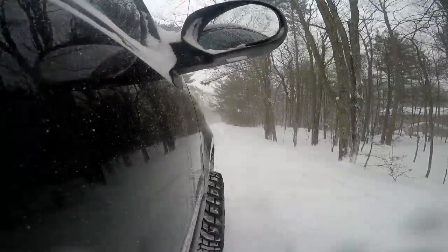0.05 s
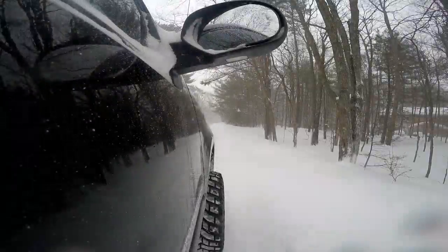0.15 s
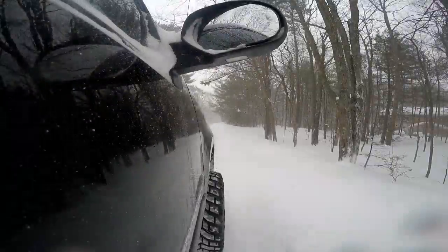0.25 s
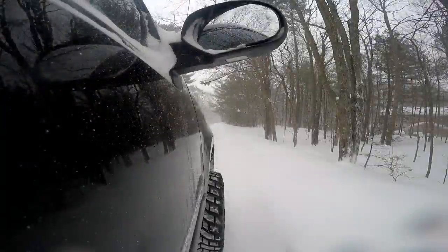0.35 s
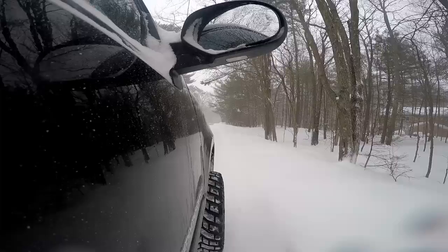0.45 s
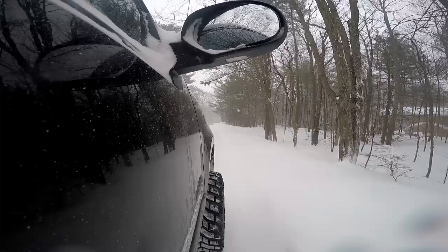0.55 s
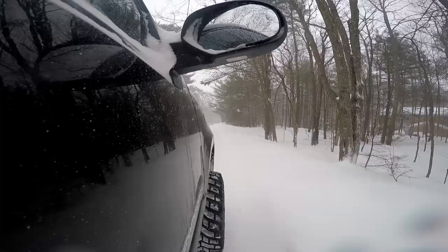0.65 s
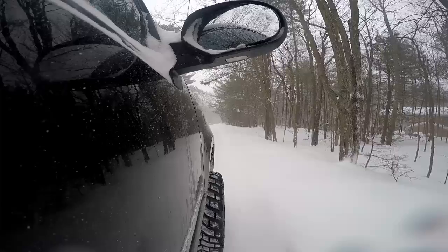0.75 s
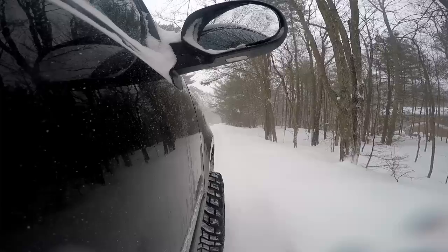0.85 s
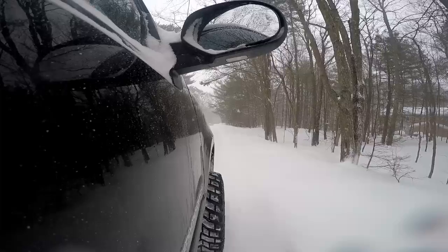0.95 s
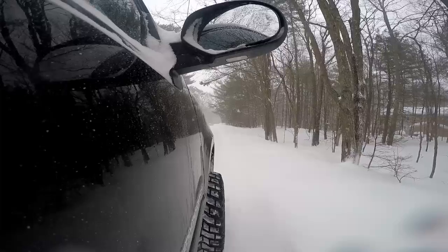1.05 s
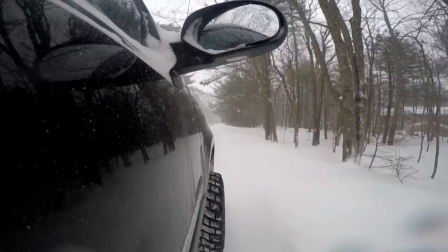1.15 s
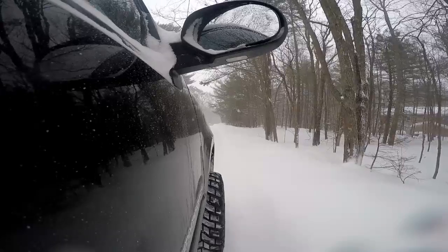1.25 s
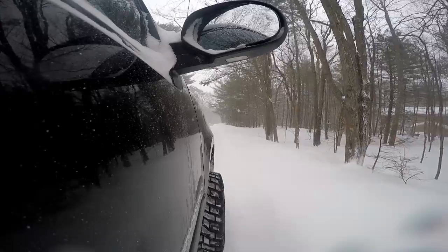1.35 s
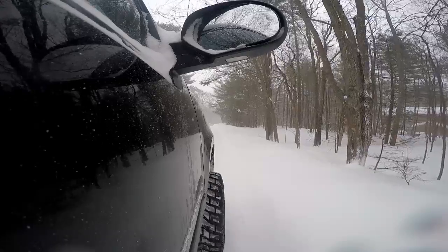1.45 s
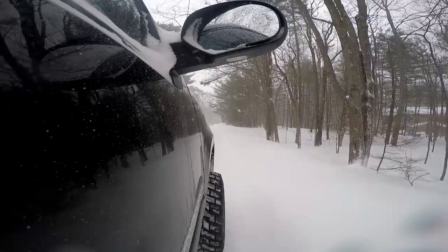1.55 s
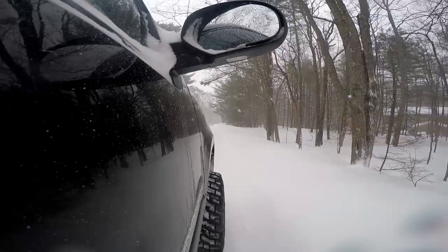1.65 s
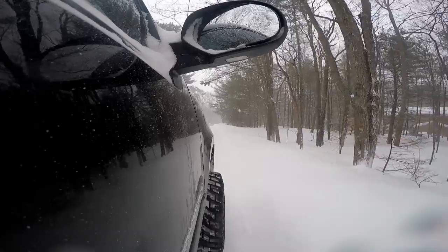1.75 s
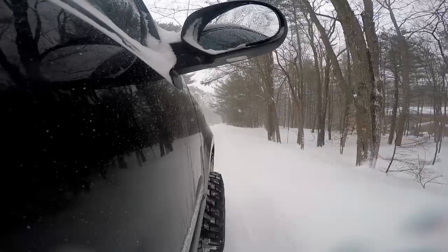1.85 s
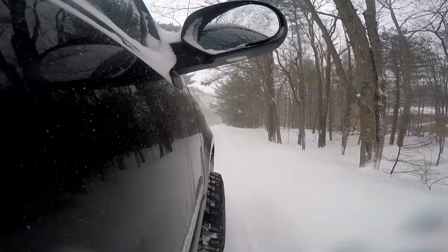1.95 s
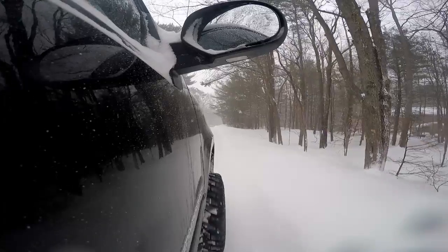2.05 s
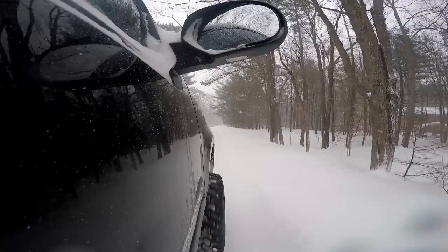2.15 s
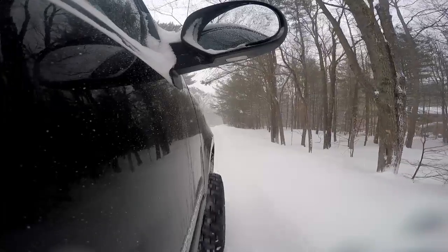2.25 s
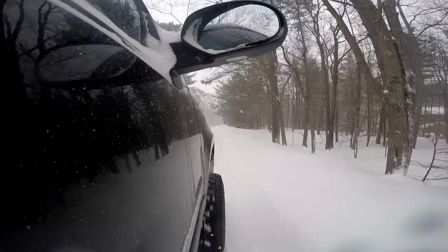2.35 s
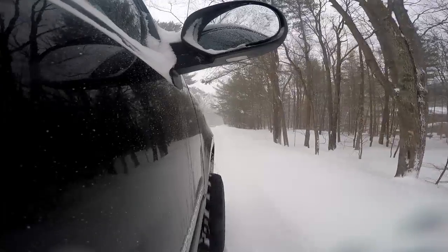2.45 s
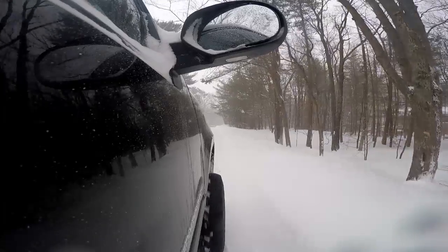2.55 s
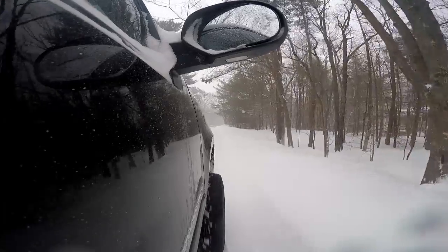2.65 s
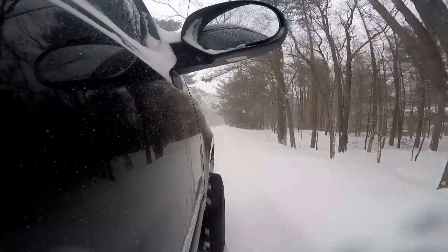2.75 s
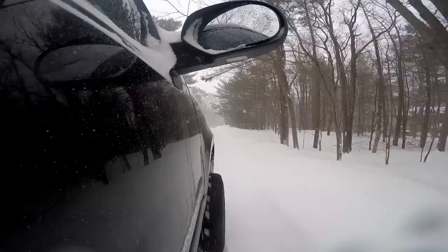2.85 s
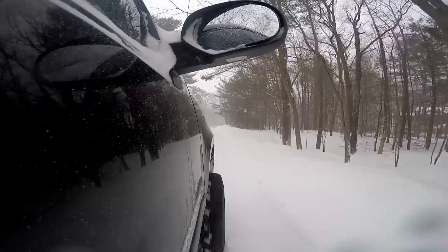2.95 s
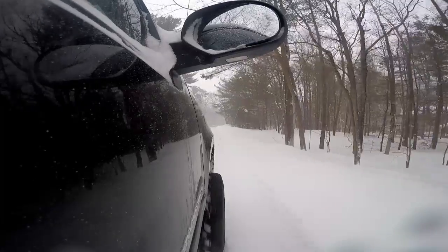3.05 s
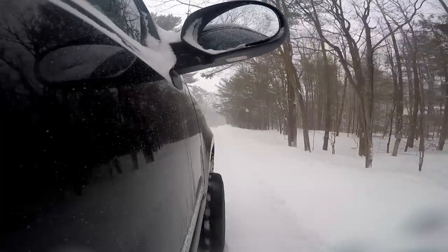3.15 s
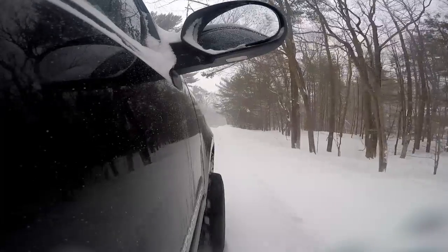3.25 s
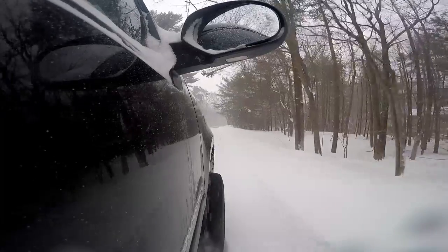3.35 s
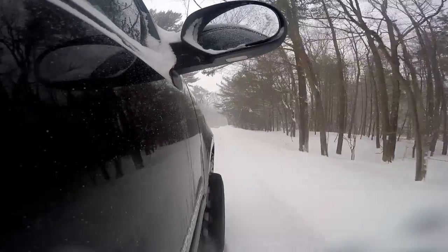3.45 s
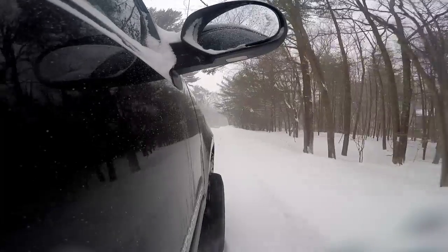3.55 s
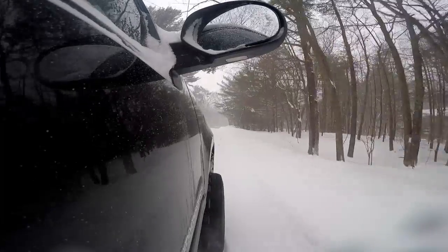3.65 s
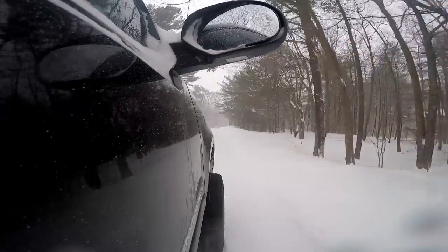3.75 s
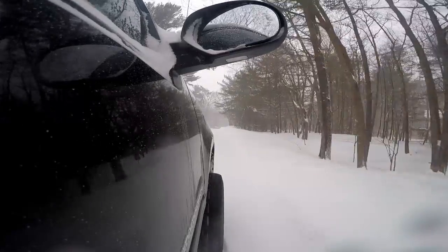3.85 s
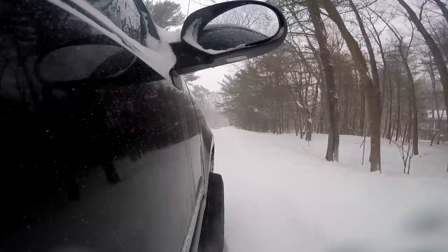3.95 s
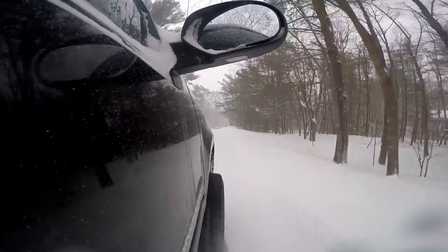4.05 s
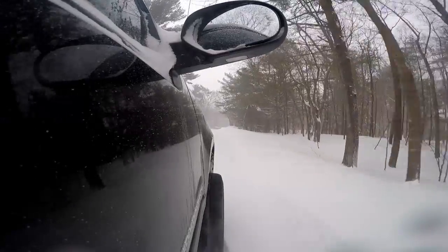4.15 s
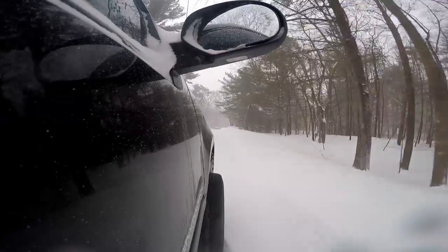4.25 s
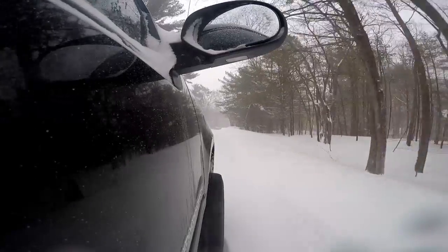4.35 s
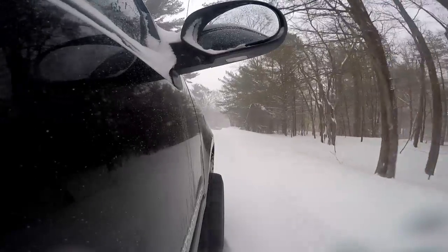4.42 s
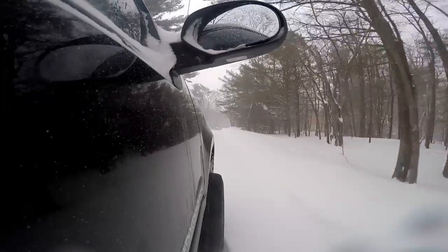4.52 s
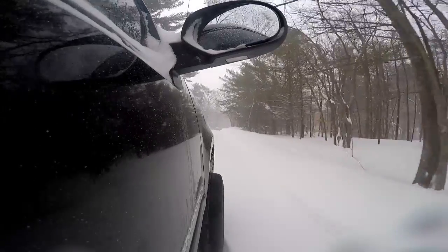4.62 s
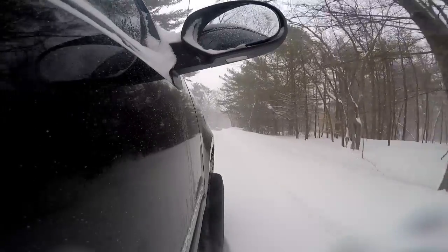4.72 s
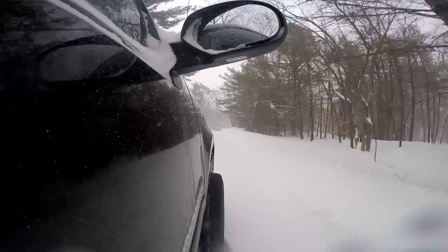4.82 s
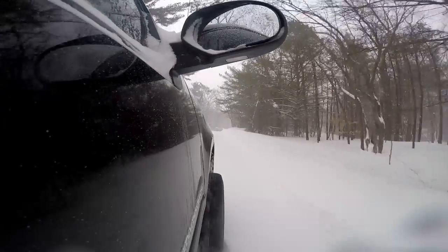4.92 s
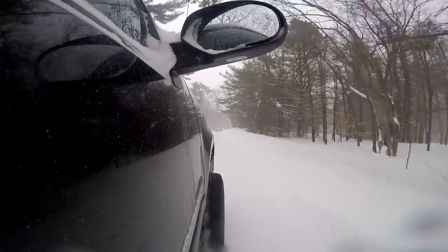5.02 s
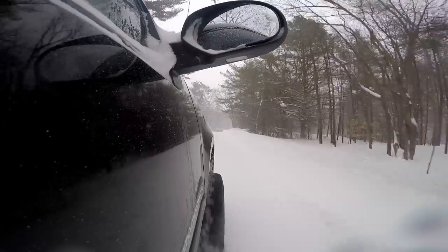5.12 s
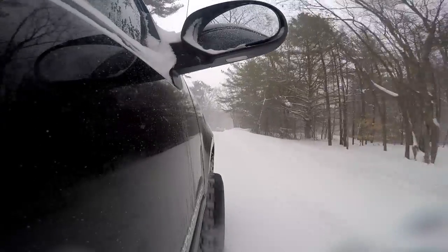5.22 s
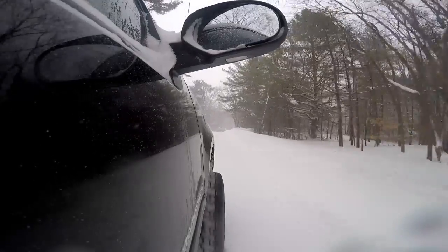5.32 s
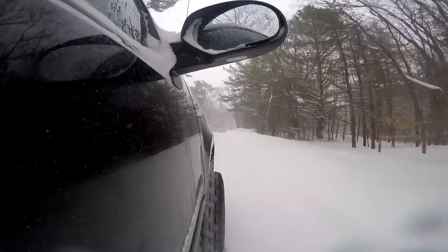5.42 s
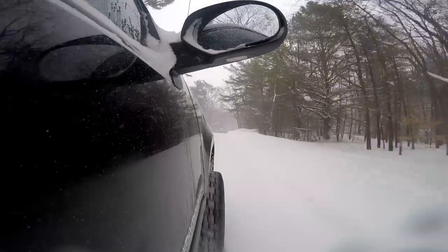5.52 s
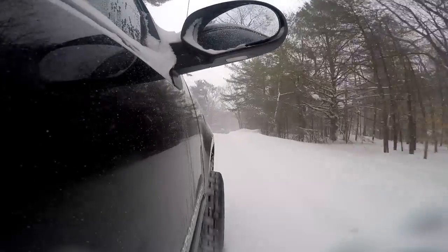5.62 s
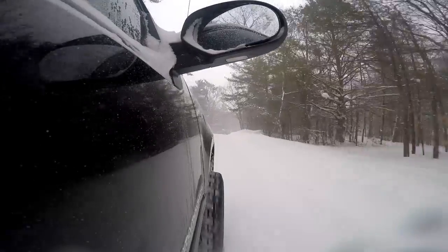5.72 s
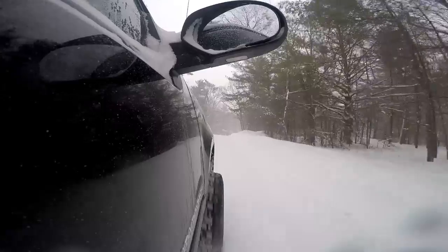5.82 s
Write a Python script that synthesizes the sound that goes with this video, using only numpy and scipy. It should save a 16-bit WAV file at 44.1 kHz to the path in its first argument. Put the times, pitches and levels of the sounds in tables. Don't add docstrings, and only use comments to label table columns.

```python
import sys
import numpy as np
from scipy import signal
from scipy.fft import rfft, irfft
from scipy.io import wavfile
from scipy.ndimage import uniform_filter1d

SR = 44100
rng = np.random.default_rng(int(sys.argv[2]) if len(sys.argv) > 2 else 0)


def elevation(decibels):
    levels = np.asarray(decibels, float)
    return 10 ** (levels / 20)


def bounce(signal):
    frames = np.transpose(np.atleast_2d(signal))
    limited = np.clip(frames, -1, 1)
    pcm = np.round(limited * 32767).astype(np.int16)
    wavfile.write(sys.argv[1], SR, pcm)


N = 259308


def rms_one(x):
    return x / np.sqrt(np.mean(x ** 2) + 1e-20)


def in_time(rows):
    s, *columns = np.transpose(rows)
    return [np.interp(np.arange(N) / SR, s, column) for column in columns]


def at_hz(points, hz):
    table_hz, table_db = np.array(points).T
    return np.interp(np.log(hz), np.log(table_hz), table_db)


def drift(rate):
    r = np.exp(-80 * np.pi * rate / SR)
    steps = rng.standard_normal(N // 40 + 2002)
    slow = signal.lfilter([1], [1, -2 * r, r * r], steps)[2000:]
    return np.interp(np.arange(N) / 40, np.arange(len(slow)), rms_one(slow))


def resonance(x, hz, width_hz):
    r = np.exp(-np.pi * width_hz / SR)
    top = np.array([1, 0, -1]) * (1 - r * r) / 2
    bottom = [1, -2 * r * np.cos(2 * np.pi * hz / SR), r * r]
    return signal.lfilter(top, bottom, x + 1e-18)


def band(x, low_hz, high_hz):
    edges_hz = [low_hz, min(high_hz, .45 * SR)]
    return signal.sosfilt(signal.butter(2, edges_hz, "band", fs=SR, output="sos"), x)


def coloured(spectrum, patchy_db):
    hz = np.maximum(np.arange(N // 2 + 1) * SR / N, 1)
    lowest_hz, highest_hz = spectrum[0][0], spectrum[-1][0]
    shaped = rfft(rng.standard_normal(N)) * elevation(at_hz(spectrum, hz)) * (hz > .7 * lowest_hz)
    out = np.zeros(N)
    for centre in np.arange(np.floor(np.log2(lowest_hz)), np.log2(highest_hz) + 1):
        share = np.clip(1 - np.abs(np.log2(hz) - centre), 0, 1)
        out += irfft(shaped * share, N) * elevation(patchy_db * drift(16.0))
    return rms_one(out)


def swells(rows, rise_db_per_s, sag_db_per_s, fall_db_per_s):
    t, out = np.arange(N) / SR, np.full(N, -90.)
    for s, peak_db, held_s, *_ in rows:
        rise_db = rise_db_per_s * np.minimum(t - s, 0)
        sag_db = sag_db_per_s * np.clip(t - s, 0, held_s)
        fall_db = fall_db_per_s * np.maximum(t - s - held_s, 0)
        out = np.maximum(out, peak_db + rise_db - sag_db - fall_db)
    return out


# (time [s], firings [per s])
SPEED_CURVE = [(0.0, 42.0), (0.52, 50.0), (0.97, 69.5), (1.25, 65.5), (1.5, 53.0), (1.88, 56.0),
               (2.13, 102.5), (2.41, 120.9), (2.7, 132.7), (3.1, 144.2), (3.96, 199.5), (4.15, 216.0),
               (4.58, 263.3), (4.66, 267.5), (4.81, 248.5), (5.4, 101.2), (5.62, 86.0), (5.88, 96.0)]
# (time [s], airflow [0-1], combustion [0-1])
PEDAL_CURVE = [(0, 0.08, 0.1), (.5, 0.19, 0), (.95, 0.04, 0.79), (1.5, 0.17, 0.2), (1.85, 0.29, 0),
               (2.12, 0.19, 0.78), (2.42, 0.29, 0.67), (2.7, 0.34, 0.41), (3.0, 0.23, 0.86),
               (3.55, 0.61, 0.67), (4.3, 0.89, 0.86), (4.6, 1, 0.85), (4.68, 0.82, 0.17), (4.8, 0.35, 0.43),
               (5.0, 0.18, 0.15), (5.28, 0.07, 0.12), (5.42, 0.35, .02), (5.62, 0, 0.46),
               (5.88, 0.49, 0.72)]


def effort(law):
    base_db, octave_db, air_db, burn_db = law
    air, burn = in_time(PEDAL_CURVE)
    speed_db = octave_db * np.log2(in_time(SPEED_CURVE)[0] / 100)
    return base_db + speed_db + air_db * air + burn_db * burn


def resonance_lift_db(hz, modes):
    power = sum(elevation(2 * top_db) / (1 + (2 * (hz - mode_hz) / width_hz) ** 2)
                for mode_hz, width_hz, top_db in modes)
    return 10 * np.log10(power)


# (pitch [Hz], level [dB])
WHINE_TONES = [
    (6310, -69),
    (12615, -73),
]


def electronics():
    t = np.arange(N) / SR
    whine = sum(elevation(level_db + 1.6 * drift(8)) * np.sin(2 * np.pi * hz * t + 0.87 * drift(6))
                for hz, level_db in WHINE_TONES)
    frames_per_s, blip_hz, blip_db = 29.97, 8600, -61.5
    gate = np.exp(-((t * frames_per_s + .5) % 1 - .5) ** 2 / 0.15 ** 2)
    return whine + elevation(blip_db) * gate * np.sin(2 * np.pi * blip_hz * t)


# (pitch [Hz], level [dB per Hz])
WIND_COLOUR = [(11, -14), (18, 5), (38, -3), (60, 2), (130, -31), (460, -37.5), (500, -39.5), (650, -59),
               (1100, -120)]
# (time [s], level [dB])
WIND_GUSTS = [(0, -37.5), (1.03, -23.5), (2.85, -19.5), (3.34, -22), (3.55, -14), (4.52, -26.5), (4.8, -22),
              (4.95, -38), (5.2, -30), (5.42, -46), (5.6, -22)]


def wind():
    return elevation(in_time(WIND_GUSTS)[0] + 0.5) * coloured(WIND_COLOUR, patchy_db=4.0)


# (pitch [Hz], level [dB per Hz])
BODY_NOISE_COLOUR = [(250, -33), (420, -9.5), (460, -5), (548, -6.5), (630, -5.5), (804, -6), (1390, -12.5),
                     (1500, -5.5), (1950, -35), (3300, -120)]
# (time [s], level [dB])
ROLLING_LEVEL = [
    (0.6, -76),
    (1.6, -56.5),
    (2.7, -45.5),
    (5.1, -54.5),
    (5.6, -47),
]
# (base [dB], per octave of speed [dB], full airflow [dB], full combustion [dB])
EXHAUST_EFFORT = (-60.5, 6.5, 13, 1.5)


def tyres_and_exhaust():
    level = np.hypot(elevation(effort(EXHAUST_EFFORT) + 5.0), elevation(in_time(ROLLING_LEVEL)[0]))
    return level * coloured(BODY_NOISE_COLOUR, patchy_db=0.97)


# (pitch [Hz], level [dB per Hz])
ENGINE_BAY_COLOUR = [(590, -29), (1000, -14), (1240, -18), (1750, 3), (2130, 1), (2680, 5), (3180, -8.5),
                     (5920, -17.5), (6480, -14), (7970, -25), (8740, -21.5), (9150, -34), (11600, -32),
                     (13100, -30), (15500, -43)]
# (base [dB], per octave of speed [dB], full airflow [dB], full combustion [dB])
ENGINE_BAY_EFFORT = (-49, 3, 13, 0.64)


def engine_bay():
    return elevation(effort(ENGINE_BAY_EFFORT) + 1.5) * coloured(ENGINE_BAY_COLOUR, patchy_db=0.57)


# (pitch [Hz], width [Hz], level [dB])
INTAKE_MODES = [(1325, 76, -7), (1690, 147, 0), (1866, 184, -1.1), (2110, 330, -2), (4660, 720, -13.5)]
# (base [dB], per octave of speed [dB], full airflow [dB], full combustion [dB])
INTAKE_EFFORT = (-50, 13, 4.5, -1)


def intake():
    singing = np.zeros(N)
    for hz, width_hz, level_db in INTAKE_MODES:
        flow = rng.standard_normal(N)
        ridge = resonance(resonance(flow, hz, width_hz), hz, width_hz)
        singing += elevation(level_db) * rms_one(ridge)
    return elevation(effort(INTAKE_EFFORT) - 6.5) * singing


# (time [s], peak level [dB])
STRAY_KNOCKS = [
    (0.19, -25),
    (0.493, -31),
    (0.649, -39),
    (0.873, -30),
    (1.381, -26),
    (1.719, -47),
    (1.984, -25),
]


def knocks():
    clicks = np.zeros(N)
    first_s, period_s, pump_db = .013, .10242, -27
    pump = [(s, pump_db) for s in np.arange(first_s, N / SR - first_s, period_s)]
    for s, peak_db in pump + list(STRAY_KNOCKS):
        clicks[round((s + .005) * SR)] = -elevation(peak_db)
    push = np.convolve(clicks, np.hanning(round(0.0044 * SR)))[:N]
    return elevation(2.0) * band(push, 127, 1300) + elevation(20) * resonance(clicks, 270, 270)


# (pitch [Hz], width [Hz], level [dB])
CASE_MODES = [(2320, 600, 3.5), (3660, 245, 4.5), (4440, 450, 6.5), (6610, 1010, 2.5), (7560, 730, 1.5),
              (9530, 1320, -1.5), (10560, 770, -2), (13430, 3400, -4.5)]


def case_ring(clicks):
    out = np.zeros(N)
    for k, (hz, width_hz, level_db) in enumerate(CASE_MODES):
        out += (-1) ** k * elevation(level_db) * resonance(clicks, hz, width_hz)
    return out


# (time [s], level [dB])
SNOW_THROW = [
    (0, -63.5),
    (2.0, -62.5),
    (3.0, -55.5),
    (3.5, -49),
    (4.25, -41.5),
    (4.55, -59.5),
    (5.09, -57.5),
    (5.45, -44.5),
    (5.7, -61),
]
# (time [s], level [dB], held [s])
SNOW_CLUMPS = [(0.0, -44.5, 0.00073), (2.26, -51.5, .005), (2.77, -51, .003), (2.95, -47, 0.0035),
               (3.68, -39.5, 0.012), (4.08, -35, 0.042), (4.22, -33.5, 0.007), (4.66, -52, 0.01965),
               (4.8, -54.5, .3), (5.17, -43, 0.0025), (5.32, -39.5, 0.0059), (5.395, -35.5, 0.0057),
               (5.445, -34, 0.029), (5.595, -40, 0.0066), (5.75, -50.5, 0.038), (5.88, -47, .002)]


def spray():
    throw_db = in_time(SNOW_THROW)[0]
    level_db = np.maximum(throw_db, swells(SNOW_CLUMPS, 710, 40, 390))
    grains_per_s = 1000 * elevation(5 * drift(25) + .5 * (level_db - throw_db))
    born = rng.random(N) < grains_per_s / SR
    sizes = elevation(4.5 * np.minimum(rng.exponential(1, N), 3.0)) * rng.choice([-1, 1], N)
    fine_dust = 0.095 * rng.standard_normal(N)
    grains = band(case_ring(born * sizes + fine_dust), 3300, 24000)
    even = np.sqrt(uniform_filter1d(grains ** 2, size=3000))
    return elevation(level_db + 1.0) * grains / even


# (time [s], peak level [dB], level above 8 kHz [dB])
ICE_LUMPS = [(0.0024, -16, -33), (1.6591, -22, -49), (2.7577, -26.5, -35), (2.9432, -23, -35),
             (3.0678, -24, -47), (3.275, -24.5, -52), (3.3333, -21.5, -41), (3.3737, -23, -37),
             (3.3975, -23.5, -44), (3.4548, -23, -29.5), (3.479, -14, -25), (3.5068, -19, -31),
             (3.5214, -20, -32.5), (3.5304, -17.5, -26), (3.5622, -21.5, -35), (3.6003, -25, -44),
             (3.8806, -24, -37), (3.944, -12, -30), (4.02, -21, -29), (4.0652, -28, -31),
             (4.2252, -31, -42), (4.6815, -27, -31.5), (5.3213, -18.5, -28.5), (5.3642, -22, -33),
             (5.399, -12, -29), (5.4391, -21, -31), (5.466, -17, -33), (5.5248, -34, -31.5),
             (5.597, -20.5, -31), (5.8764, -19.5, -39)]
# (time [s], peak level [dB])
ICE_PELLETS = [(0.4912, -32), (0.5097, -34), (0.5784, -37), (0.7092, -35.5), (0.819, -32), (3.289, -25),
               (0.9413, -36), (1.6138, -38), (1.6766, -31), (1.7689, -35), (1.82, -36), (2.171, -34),
               (2.2498, -29), (2.8185, -36), (2.95, -26), (2.9797, -35), (3.0967, -26), (3.239, -29),
               (3.315, -26), (3.6604, -25), (3.7675, -28), (3.846, -43), (4.143, -23), (4.304, -34),
               (5.1706, -37), (5.2609, -35), (5.5519, -28), (5.6384, -30), (5.7569, -29), (5.8704, -25)]


def ticks():
    low, high = np.zeros(N), np.zeros(N)
    fade = np.exp(-np.arange(300) / SR / 0.00074)
    pellets = [(s, peak_db, peak_db - 9) for s, peak_db in ICE_PELLETS]
    for s, peak_db, top_db in list(ICE_LUMPS) + pellets:
        burst = rng.standard_normal(len(fade)) * fade
        burst[0] += 4.0
        burst = burst / np.sqrt(np.sum(burst ** 2))
        i = round(s * SR)
        low[i:i + len(fade)] += elevation(peak_db) * burst[:N - i]
        high[i:i + len(fade)] += elevation(top_db) * burst[:N - i]
    dull = elevation(15.0) * band(case_ring(low), 2700, 9400)
    bright = elevation(25.5) * band(case_ring(high), 7250, 16100)
    return dull + bright


# (time [s], level [dB], held [s])
FLOOR_RUTS = [
    (3.45, -23.5, 0.013),
    (5.56, -24.5, .01),
    (5.76, -35, 0.047),
]


def floor_pan():
    tone = np.sin(2 * np.pi * 103.7 * np.arange(N) / SR)
    return np.sqrt(2) * elevation(swells(FLOOR_RUTS, 240, 30, 280)) * tone


# (time [s], level [dB], held [s], pitch [Hz])
DOOR_JOLTS = [(0.0, -29.5, 0.27, 39.76), (.55, -25, 0.094, 38.96), (.8, -19, 0.11, 38.33),
              (1.0, -23.5, 0.017, 36.9), (1.19, -20.5, 0.075, 39.1), (1.42, -28, 0.0092, 38.44),
              (1.59, -24.5, 0.45, 36.6), (2.03, -9.5, 0.092, 39.6), (2.4, -4.5, 0.39, 39.73),
              (2.9, -14.5, 0.016, 40.18), (3.08, -10, 0.23, 39.93), (3.41, -14, 0.011, 39.17),
              (3.51, -5.5, 0.49, 38.5), (3.95, -6.5, .39, 39.15), (4.45, -5.5, 0.14, 38.37),
              (4.73, -7.5, .1, 38.2), (4.98, -12, 0.11, 35.73), (5.22, -9.5, 0.29, 37.95),
              (5.45, -8.5, 0.097, 38.5), (5.66, -10.5, 0.15, 38.7)]


def door():
    hz, level_db = in_time(DOOR_JOLTS)[-1], swells(DOOR_JOLTS, 195, 7.4, 170)
    swing = np.sqrt(2) * np.sin(2 * np.pi * np.cumsum(hz) / SR + 0.5 * drift(3.8))
    shaken = resonance(resonance(rng.standard_normal(N), 53.6, 6.1), 53.6, 6.1)
    return elevation(level_db) * (swing + 0.13 * rms_one(shaken))


# (order [eighths of the firing rate], level [dB])
CYLINDER_ORDERS = [(1, -18), (2, 7), (4, 11), (5, 7.5), (6, 4), (7, 2), (9, 4), (10, -7), (11, 2),
                   (12, -10), (13, -1.5), (14, -1), (15, -19.5), (17, -9), (18, -7.5), (19, -13), (20, -1),
                   (21, -11), (22, -8), (23, -11), (24, -4), (26, -6), (28, -6.5), (29, -11), (30, -6.5),
                   (32, -17.5)]
# (pitch [Hz], level [dB])
BODY_PASS = [(20, -6.5), (60, -13.5), (100, 2), (140, -6), (200, -4.5), (270, -7), (310, -11), (365, -1.5),
             (410, -8.5), (500, -3.5), (560, -36.5), (800, -44), (1100, -28)]
# (pitch [Hz], width [Hz], level [dB])
FRAME_MODES = [(50.6, 12, 0), (73.4, 13, -2), (105.3, 17.6, 3), (140.05, 37, -3.5), (169.2, 28, -0.5),
               (215.7, 6.55, 1.5), (259, 17, -1.5), (119, 8.6, 2), (195, 15, -7)]
# (pitch [Hz], width [Hz], level [dB])
PIPE_MODES = [(135, 30, -1.5), (179, 15, 7), (265.3, 22, 2), (362, 46.6, 1.5), (416, 55, -5), (492, 28, -4)]
# (time [s], level [dB])
DRIVELINE_SHUDDER = [
    (0, -68),
    (2, -37),
    (3.6, -50),
    (4, -41),
    (4.3, -38),
    (4.6, -23),
    (5.1, -28),
    (5.25, -29),
    (5.5, -41),
]
# (base [dB], per octave of speed [dB], full airflow [dB], full combustion [dB])
FIRING_EFFORT = (-39.5, -0.5, -3.4, 19)
OCTAVE_EFFORT = (-54.5, -0.5, 6.5, 16)
UNEVEN_EFFORT = (-45.5, 0.95, 5.5, 6.5)
TILT_EFFORT = (-2, .3, 9, -2.3)


def engine():
    rate = in_time(SPEED_CURVE)[0]
    burn = in_time(PEDAL_CURVE)[1]
    cycle = 2 * np.pi * np.cumsum(rate) / SR / 8
    rough_db = 2.5 * (1 - burn) ** 2 * np.abs(drift(20))
    firing_db = effort(FIRING_EFFORT) + resonance_lift_db(rate, FRAME_MODES) - rough_db
    octave_db = effort(OCTAVE_EFFORT) + resonance_lift_db(2 * rate, PIPE_MODES)
    shudder_db = in_time(DRIVELINE_SHUDDER)[0]
    out = np.zeros(N)
    for order, level_db in [(8, firing_db), (3, shudder_db), (16, octave_db)]:
        level = np.sqrt(2) * elevation(level_db + 2.2 * drift(9))
        out += level * np.sin(order * cycle + .2 * drift(8))
    load_db, tilt_db = effort(UNEVEN_EFFORT), effort(TILT_EFFORT)
    coarse = np.arange(0, N, 64)
    for order, level_db in CYLINDER_ORDERS:
        body_db = np.interp(np.arange(N), coarse, at_hz(BODY_PASS, order * rate[coarse] / 8))
        slope_db = tilt_db * np.log2(order / 8)
        level = elevation(load_db + level_db + body_db + slope_db + 2.8 * drift(5))
        out += level * np.sin(order * cycle + rng.uniform(0, 2 * np.pi) + .2 * drift(5))
    return out


def scene():
    air_noise = wind() + tyres_and_exhaust() + engine_bay() + intake()
    impacts = knocks() + spray() + ticks()
    booms = floor_pan() + door()
    return (electronics() + air_noise + impacts + booms + engine())[None]


def band_limit(x):
    return signal.sosfilt(signal.butter(12, 16470, fs=SR, output="sos"), x)


def record(dry):
    cut = signal.sosfilt(signal.cheby2(12, 50, 16100, fs=SR, output="sos"), dry)
    rounded = 1.3 * np.tanh(cut / 1.4)
    return band_limit(rounded)


dry = scene()
out = record(dry)
bounce(out)
```